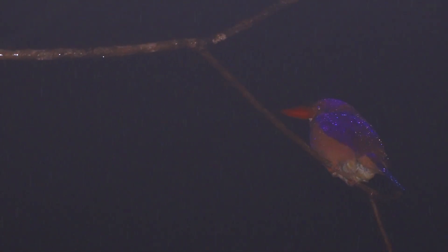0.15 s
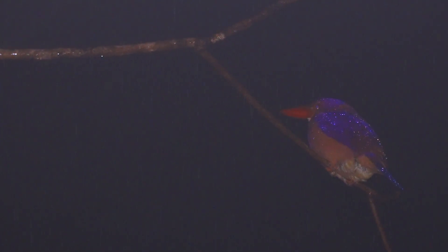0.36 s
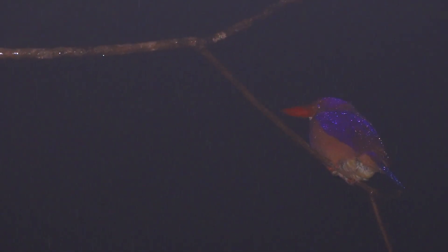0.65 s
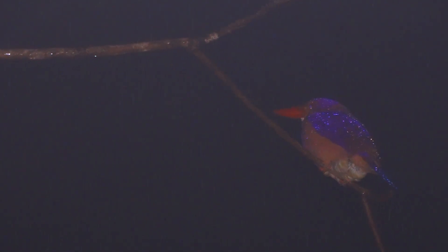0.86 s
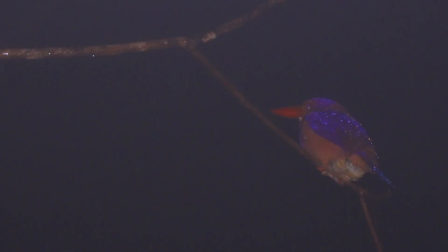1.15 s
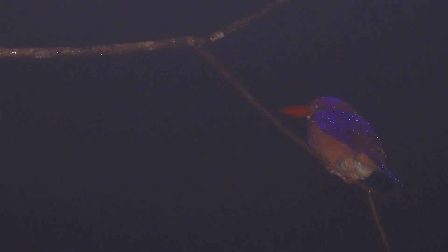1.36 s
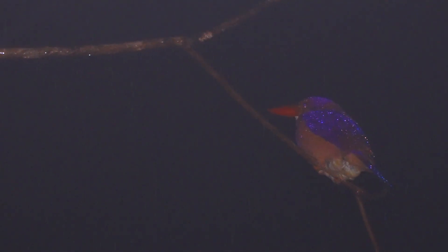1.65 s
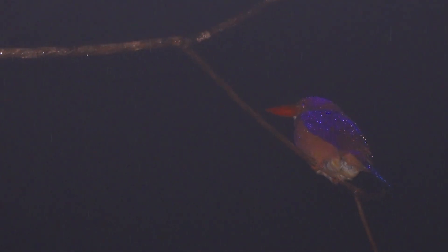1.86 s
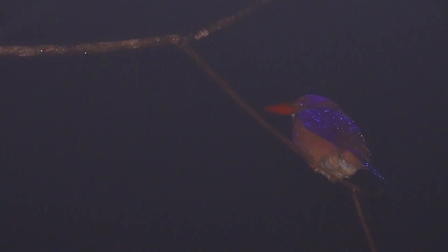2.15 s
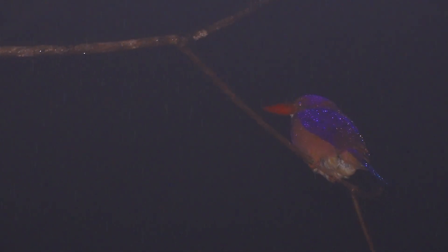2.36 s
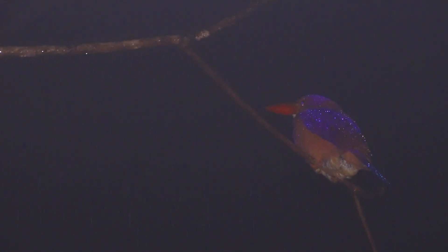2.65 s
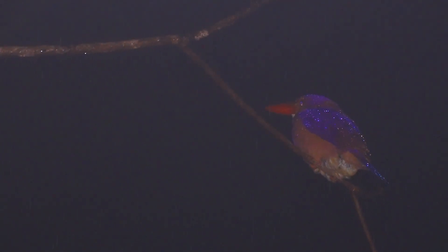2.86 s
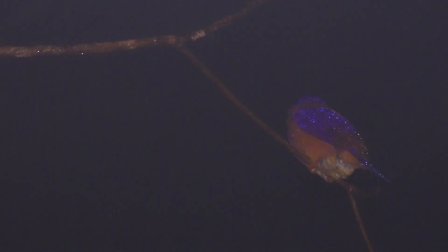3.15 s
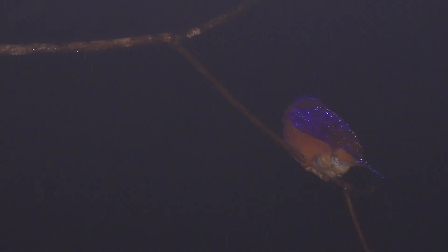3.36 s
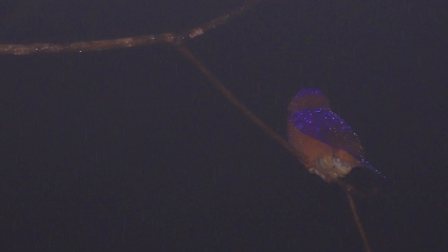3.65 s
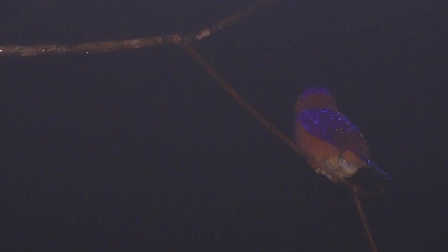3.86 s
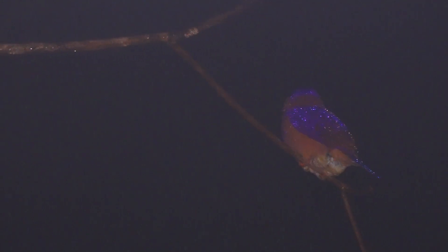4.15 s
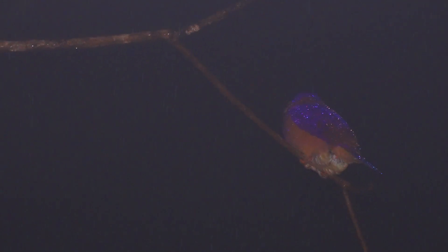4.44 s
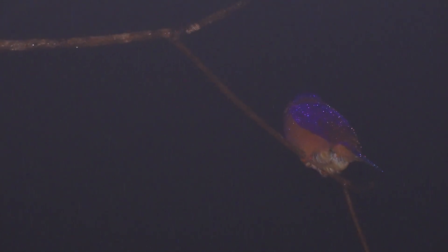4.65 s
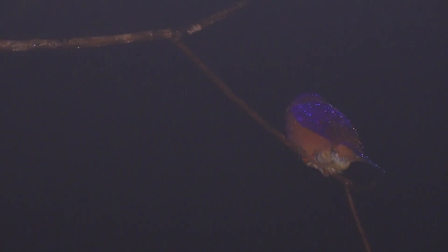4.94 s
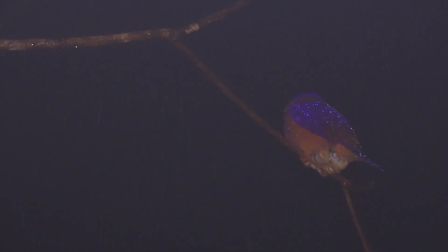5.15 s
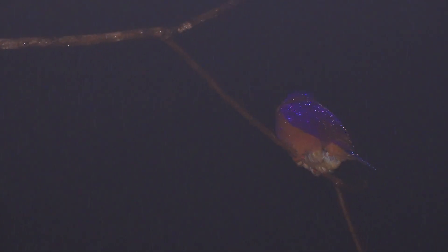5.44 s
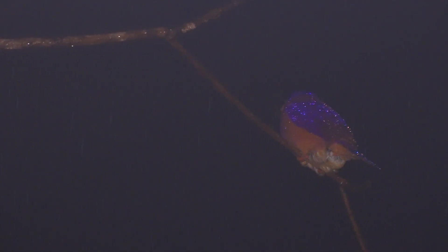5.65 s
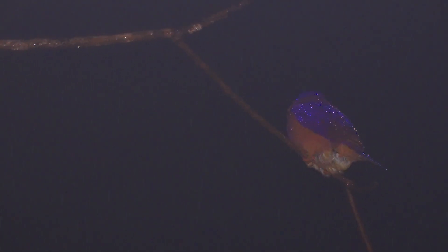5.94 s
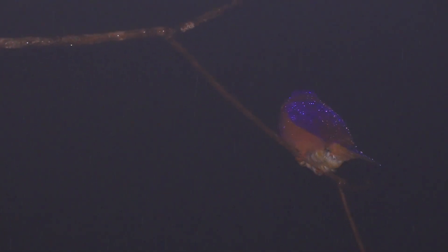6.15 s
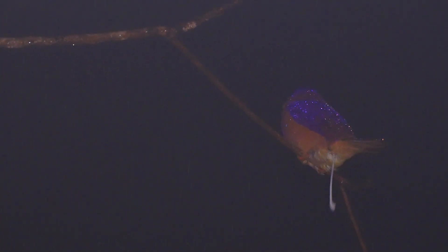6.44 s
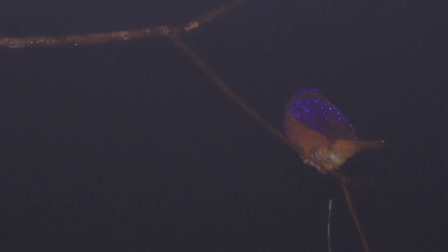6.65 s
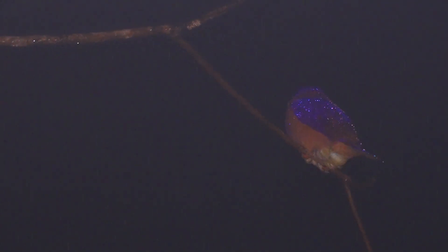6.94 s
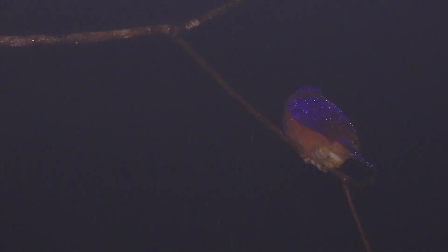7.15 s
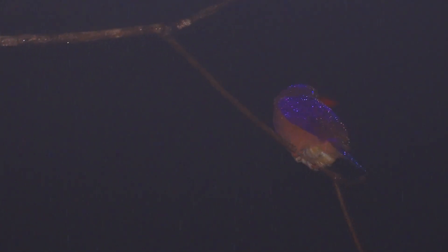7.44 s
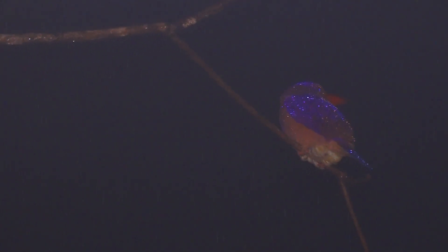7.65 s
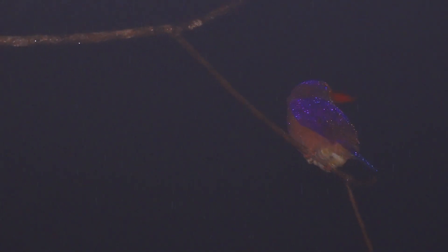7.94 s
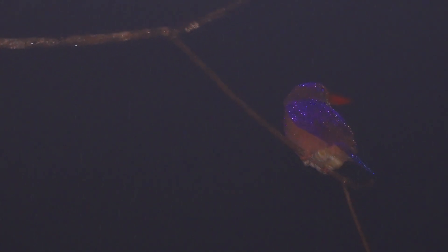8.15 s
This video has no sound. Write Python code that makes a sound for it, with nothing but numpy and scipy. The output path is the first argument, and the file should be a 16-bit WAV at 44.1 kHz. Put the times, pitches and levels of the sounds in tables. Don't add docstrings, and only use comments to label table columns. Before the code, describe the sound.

A near katydid rasps short, high buzzes about every 0.7 seconds over distant rain, cricket trills, faint frog pips and scattered drips.

```python
import sys
import numpy as np
from scipy import signal
from scipy.io import wavfile
from scipy.ndimage import uniform_filter1d

SR = 44100
rng = np.random.default_rng(int(sys.argv[2]) if len(sys.argv) > 2 else 0)


def materialize(psi):
    bounded = np.clip(np.atleast_2d(psi).T, -1, 1)
    quanta = np.round(bounded * 32767).astype(np.int16)
    wavfile.write(sys.argv[1], SR, quanta)


def voltage_ratio(level):
    return 10 ** (np.asarray(level, float) / 20)


N = 366010

# [t/s, peak level/dB, hold/s, hiss level/dB]
NEAR_BUZZES = [
    (0.698, -31.5, 0.0095, -46.5),
    (1.423, -33.5, 0.0358, -45.5),
    (2.198, -32.5, 0.016, -48),
    (3.686, -34, 0.029, -54),
    (4.362, -31.5, 0.01, -46),
    (5.015, -32.5, 0.024, -43),
    (5.804, -32.5, .015, -45),
    (6.538, -32, 0.021, -46),
    (7.27, -31.5, 0.014, -51.5),
    (8.218, -32.5, 0.0205, -52),
]
NEAR_TEETH_HZ = [341.0, 340.8, 342.2, 343.8, 342.0, 341.0, 341.8, 340.8, 340.4, 340.8]
# [f/Hz, width/Hz, level/dB]
WING_MODES = [(9570, 280, 0), (8990, 220, -10), (11950, 500, -17), (14800, 2300, -17)]
# [t/s, level/dB, left-right level/dB]
FAR_BUZZES = [
    [(.01, -40.5, -15), (.33, -45, -7), (.44, -48, -10), (1.08, -48, -11.5), (1.28, -46, -6),
     (1.96, -45, -6.5), (2.62, -48.5, -4), (2.72, -50, -17), (3.48, -43.5, -3), (4.1, -45.5, -11),
     (4.75, -69, 0), (5.51, -48, -7), (6.24, -46.5, -3.5), (6.97, -47, -10), (7.14, -63.5, -3),
     (7.77, -51, -12)],
    [(3.07, -43.5, -10), (3.2, -47, -8), (8.09, -44.5, -13)],
]
FAR_TEETH_HZ = [336.6, 311.6]
LOW_WING, HIGH_WING = (8330, 820), (10170, 640)  # f/Hz, width/Hz
LEAD_S, RISE_S, RISE_DB = .035, 0.03523, -13.5
SLIP_DB, SLIP_S, FADE_DB_PER_S, TAIL_S = -3.5, 0.011, -150, 0.15
TURN_S, TURN_WIDTH_S = .018, .009
LOW_DB, HIGH_DB = (4, -10), (-6, 0)
HISS_DELAY_S, HISS_S, HISS_PAN_DB, HISS_LOW_DB = 0.042, 0.12, -3, 0.5

# [t/s, level/dB, length/s, lower mode
# level/dB]
LEFT_RASPS = [(.022, -51, .043, -7.5), (.195, -51.5, .02, -3), (.243, -45, 0.017, -4),
              (.632, -49.5, 0.047, -8), (0.808, -41.5, 0.15, -12), (1.524, -41, 0.089, 0),
              (3.045, -46, .037, -7), (3.167, -40, 0.047, -16), (3.543, -43, 0.061, -2),
              (4.938, -42.5, 0.0565, -1.5), (5.542, -42.5, 0.056, -15), (5.69, -48, 0.163, -13),
              (7.214, -45, .12, -15)]
# [t/s, level/dB, length/s, lower mode
# level/dB]
RIGHT_RASPS = [(.928, -43, 0.025, -9), (1.172, -49.5, .1, -4), (1.304, -51, .022, -4),
               (2.59, -47.5, .096, -4), (2.72, -46, .015, -4), (3.341, -41.5, 0.085, -5.5),
               (4.008, -44, 0.088, -7), (5.136, -44, 0.042, 0), (6.176, -41.5, .075, -5.5),
               (6.358, -48, 0.056, -6), (7.63, -53, .062, -5), (7.911, -41, 0.074, -10)]
LEFT_PAN_DB, RIGHT_PAN_DB = 13, -13.5

# [t/s, level/dB, left-right level/dB]
PEEPS = [
    (0.7298, -36, -1),
    (1.1717, -37.5, -11),
    (1.6132, -39, -16),
    (2.0552, -38.5, -14),
    (2.5022, -37.5, -14),
    (2.942, -39, -7),
    (6.6493, -58, -2.5),
    (7.5552, -39, -16),
    (8.001, -38.5, -6),
]
# [t/s, level/dB, gap/s]
CHURRS = [
    (.21, -55, 0.263),
    (1.4, -55.5, 0.196),
    (2.45, -57, 0.22),
    (3.46, -57, 0.25),
    (4.58, -55.5, 0.256),
    (5.68, -56.5, 0.25),
    (7.05, -55.5, 0.27),
    (8.18, -54, .3),
]
SWELL_S, CUT_S, SECOND_S, SECOND_DB, MUTTER_DB = 0.14, 0.11, 0.099, -3.5, -70
# [t/s, left return/s, right return/s]
TRILL_BREAKS = [
    (2.4, 1.5, 1),
    (7.26, 1.1, 0.56),
]
TRILL_DB, PAUSE_DB = (-50.5, -51), -19

# [t/s, level/dB, f/Hz, left-right level/dB, t60/s]
LEAF_DROPS = [(.308, -40, 740, 0, 0.035), (0.482, -28, 1690, 8.5, 0.0216), (1.538, -33, 2570, -14, 0.023),
              (1.794, -38.5, 1290, -9, 0.0225), (2.604, -31, 2700, 1, .012), (2.684, -34, 850, .5, .03),
              (2.726, -33.5, 1940, -16, 0.017), (3.44, -27.5, 2940, 0, 0.012), (3.449, -36, 1130, -14, .03),
              (4.878, -31, 3060, 0, 0.0107), (5.077, -32, 2790, 4, 0.015), (5.843, -47.5, 1770, 2.5, .02),
              (6.087, -41, 2490, 1, 0.013), (7.013, -43, 880, 9, .02), (7.272, -26.5, 2020, 1, 0.01)]
# [t/s, level/dB, f/Hz, left-right level/dB, t60/s]
TWIG_TICKS = [(0.2409, -31.5, 9000, 5, 0.008), (0.4794, -39, 9000, 0.5, 0.008),
              (1.0428, -30.5, 9000, -4, 0.008), (1.0591, -27.5, 9100, -5, 0.0064),
              (2.5564, -34.5, 9000, -15, 0.008), (2.7251, -29, 8900, -4.0, 0.008),
              (3.4644, -29.5, 9000, -1.5, 0.008), (3.6603, -25, 9000, -3.5, 0.008),
              (3.9245, -30, 9000, -2.5, 0.008), (4.8794, -44, 9000, -2, 0.008),
              (6.912, -29, 8900, -0.5, 0.0068)]
# [t/s, level/dB, f/Hz, left-right level/dB, t60/s]
THUDS = [
    (2.604, -48, 480, 3, 0.071),
    (5.114, -52.5, 320, -16.5, 0.15),
    (5.348, -58, 264, -20, 0.067),
    (6.159, -59, 333, -19, 0.079),
    (6.82, -53, 298, -4.5, 0.082),
    (7.304, -59, 302, -19.5, 0.076),
]
# [f/Hz, level/dB, t60/s]
LEAF_MODES = [(569, 5, 0.05), (1049, -4.5, 0.068), (1240, 2, 0.07), (1660, -4, .06), (1757, -10, 0.125)]

# [f/Hz, level/dB per Hz]
WASH_SPECTRUM = [(25, -24), (60, -32.5), (130, -15.5), (400, -17), (670, -4.5), (1700, -2), (2900, -5),
                 (3680, -8.5), (4450, -4), (6300, -1.5), (7600, -4.5), (10000, -6.5), (11500, -8),
                 (15800, -10)]
# [f/Hz, correlation]
WASH_LIKENESS = [(60, 0.85), (130, 0.74), (290, 0.266), (640, 0.61), (1410, 0.174), (3100, -0.47),
                 (6820, -0.47), (15000, -0.48)]
# [f/Hz, left-right level/dB]
WASH_LEAN = [(60, 12), (180, -5), (550, 1.5), (1650, 1), (4970, -3), (15000, -1)]
# [f/Hz, level/dB]
HUM = [(48.4, -95), (70.0, -84.5), (118.4, -83)]
WASH_DB = -44.5

EDGE_HZ = 15840
THINNED_HZ, THIN_ABOVE_DB, THIN_SHARE = (2700, 6300), -45, .32


def katydids():
    near, far = np.zeros((2, 2, N))
    for (s, db, hold, _), teeth_hz in zip(NEAR_BUZZES, NEAR_TEETH_HZ):
        add(near, s - LEAD_S, scrape(*stroke(db, hold), teeth_hz), -11, lag=4)
    t = np.arange(-.09, .09, 1 / SR)
    for rows, teeth_hz in zip(FAR_BUZZES, FAR_TEETH_HZ):
        for s, db, pan_db in rows:
            add(far, s - .1, scrape(db - 1500 * t ** 2, -8, -2.5, teeth_hz), pan_db, lag=4)
    direct = (voltage_ratio(-1.0) * near + voltage_ratio(-10.5) * far) * [[-1], [1]]
    return direct + voltage_ratio(-6.5) * forest(near, t60=0.53) + voltage_ratio(-10) * forest(far)


def stroke(peak_db, hold):
    t = np.arange(-LEAD_S, RISE_S + hold + TAIL_S, 1 / SR)
    after = np.maximum(t - RISE_S - hold, 0)
    rise_db = RISE_DB * np.maximum(1 - t / RISE_S, 0) ** 1.7
    slip_db = SLIP_DB * np.minimum(after / SLIP_S, 1)
    effort_db = peak_db + (rise_db + slip_db + FADE_DB_PER_S * after)
    turned = .5 + .5 * np.tanh((t - TURN_S) / TURN_WIDTH_S)
    return [effort_db] + [a + (b - a) * turned for a, b in (LOW_DB, HIGH_DB)]


def scrape(effort_db, low_db, high_db, teeth_hz):
    teeth = strikes(teeth_hz, .0015, size=len(effort_db), spread_db=.7)
    last_gap = np.zeros(rng.integers(30, 90))
    repeats = np.r_[1, np.zeros(36), .25, np.zeros(22), .15, last_gap, .25]
    teeth = evened(signal.lfilter(repeats, 1, teeth))
    teeth = rattle(teeth, rng.integers(40, 56), .6)
    teeth = rattle(teeth, rng.integers(21, 31), -.5)
    teeth = teeth + np.linspace(.12, 1.0, len(teeth)) * rng.standard_normal(len(teeth))
    sound = np.zeros(len(teeth))
    for k, (hz, width, db) in enumerate(WING_MODES):
        sound += (-1) ** k * voltage_ratio(db) * evened(resonate(teeth, hz, width))
    sound = evened(sound)
    sound += voltage_ratio(low_db) * evened(resonate(teeth, *LOW_WING))
    sound -= voltage_ratio(high_db) * evened(resonate(teeth, *HIGH_WING))
    return voltage_ratio(effort_db) * sound * signal.windows.tukey(len(teeth), .15)


def rattle(x, delay, share):
    loop = np.r_[1, np.zeros(delay - 1), share]
    return signal.lfilter(loop[::-1], loop, x)


def rasps():
    out = np.zeros((2, N))
    rows = [(*r, LEFT_PAN_DB) for r in LEFT_RASPS] + [(*r, RIGHT_PAN_DB) for r in RIGHT_RASPS]
    rows += [(s + HISS_DELAY_S, db, HISS_S, HISS_LOW_DB, HISS_PAN_DB) for s, _, _, db in NEAR_BUZZES]
    t = np.arange(-.15, .15, 1 / SR)
    for s, db, length, low_db, pan_db in rows:
        grit = strikes(1300, .3, size=len(t), spread_db=2.5)
        ring = evened(resonate(grit, 14570, 2560)) + voltage_ratio(low_db) * evened(resonate(grit, 13080, 2100))
        swell = np.exp(-(t / (0.46 * length)) ** 2) + 0.186 * np.exp(-abs(t) / 0.061)
        add(out, s - .15, voltage_ratio(db) * ring * swell, pan_db, lag=3)
    return voltage_ratio(-5) * out * [[1], [-1]] + voltage_ratio(-3.0) * forest(out, t60=0.377)


def crickets():
    t = np.arange(N) / SR
    churr, peeps = np.zeros((2, 2, N))
    beat = strikes(45.17, .006, size=N, spread_db=2.5)
    beat = beat + 0.4 * np.roll(beat, 325) + 0.123 * np.roll(beat, 651)
    trill = evened(forest(resonate(beat, 7190, 330)[None], t60=0.36)) * trill_level(t)
    grit = strikes(120, .4, size=N, spread_db=3.5)
    add(churr, 0, churr_level(t) * evened(resonate(grit, 4500, 520)), -2.5)
    u = np.arange(0, .04, 1 / SR)
    peep = np.sin(2 * np.pi * np.cumsum(6120 - 14000 * u) / SR) * np.sin(np.pi * u / .04) ** 2
    for s, db, pan_db in PEEPS:
        add(peeps, s - .01, voltage_ratio(db - 1.5) * peep, pan_db / 4, lag=2)
    echoes = forest(voltage_ratio(2.5) * churr + voltage_ratio(1) * peeps, t60=.2)
    return trill + voltage_ratio(4) * churr * [[1], [-.35]] + voltage_ratio(-0.5) * peeps + echoes


def trill_level(t):
    gone = sum((t > s) * np.clip(1 - (t - s) / np.c_[back], 0, 1) for s, *back in TRILL_BREAKS)
    return voltage_ratio(np.c_[list(TRILL_DB)] + PAUSE_DB * uniform_filter1d(gone, 3000))


def churr_level(t):
    level = voltage_ratio(MUTTER_DB) * np.ones(len(t))
    for s, db, gap in CHURRS:
        level += voltage_ratio(db) * np.exp(-((t - s) / np.where(t < s, SWELL_S, CUT_S)) ** 2)
        level += voltage_ratio(db + SECOND_DB) * np.exp(-((t - s - gap) / SECOND_S) ** 2)
    return level


def frog():
    cycle = np.roll(strikes(5.98, .002, size=N, spread_db=3.5), 300)
    low = resonate(cycle + 0.33 * np.roll(cycle, 3600), 1722, 71.5)
    pips = voltage_ratio(-69) * evened(low) + voltage_ratio(-74.5) * evened(resonate(cycle, 1962, 65))
    pips = pips * voltage_ratio([[3], [-3]])
    return pips + voltage_ratio(2.5) * forest(pips, t60=0.38, likeness=0.29)


def drops():
    out, t = landed(LEAF_DROPS + TWIG_TICKS), np.arange(3000) / SR
    leaf = sum(voltage_ratio(db - 60 * t / t60) * np.sin(2 * np.pi * hz * t) for hz, db, t60 in LEAF_MODES)
    add(out, LEAF_DROPS[1][0], voltage_ratio(-40.5) * leaf, 5)
    u = t[:600]
    for hz in np.geomspace(700, 9000, 10):
        size = voltage_ratio(4.55 * np.minimum(rng.exponential(1, (2, N)), 5)) * (rng.random((2, N)) < 14 / SR)
        tap = np.sin(2 * np.pi * hz * u) * np.exp(-u * hz / 4.8)
        out += voltage_ratio(-64.5) * signal.oaconvolve(size, tap[None], axes=1)[:, :N]
    out = signal.sosfilt(signal.butter(3, 480, "highpass", fs=SR, output="sos"), out)
    out += signal.sosfilt(signal.butter(2, 100, "highpass", fs=SR, output="sos"), landed(THUDS))
    return out + voltage_ratio(-7) * forest(out, t60=.12, likeness=.3)


def landed(rows):
    out, t = np.zeros((2, N)), np.arange(3000) / SR
    for s, db, hz, pan_db, t60 in rows:
        spray = 0.125 * rng.standard_normal(3000) * voltage_ratio(-60 * t / t60)
        splash = resonate((t == 0) + spray, hz, 0.515 * hz)
        add(out, s, voltage_ratio(db - 4.5) * splash / abs(splash).max(), pan_db)
    return out


def wash():
    frames, hz = N // 256 + 5, np.fft.rfftfreq(1024, 1 / SR)
    a, b, c, d, patches = rng.standard_normal((frames, 513, 5)).T
    patches = evened(uniform_filter1d(uniform_filter1d(patches, 14, 0), 12, 1))
    flicker = evened(uniform_filter1d(rng.standard_normal(frames), 6))
    same = np.clip(read(WASH_LIKENESS, hz), -1, 1)[:, None]
    left = a + 1j * b
    right = same * left + np.sqrt(1 - same ** 2) * (c + 1j * d)
    level_db = read(WASH_SPECTRUM, hz)[:, None] + 1.54 * patches + 0.42 * flicker
    lean_db = read(WASH_LEAN, hz)[:, None] * [[[.5]], [[-.5]]]
    spectra = np.array([left, right]) * voltage_ratio(level_db + lean_db)
    rain = signal.istft(spectra, nperseg=1024, noverlap=768)[1][:, :N]
    t = np.arange(N) / SR
    hum = sum(voltage_ratio(db + 4.5) * np.sin(2 * np.pi * f * t + [[0], [.6]]) for f, db in HUM)
    return voltage_ratio(WASH_DB) * evened(rain) + hum


def forest(x, t60=.5, likeness=-.3):
    grid = np.arange(100, SR // 3, 20)
    at = grid + rng.integers(0, 20, (2, len(grid)))
    taps = np.zeros((2, SR // 3 + 20))
    np.put_along_axis(taps, at, rng.choice([-1., 1.], at.shape) * voltage_ratio(-60 * at / SR / t60), 1)
    taps[1] = likeness * taps[0] + np.sqrt(1 - min(likeness ** 2, 1)) * taps[1]
    return signal.oaconvolve(x.mean(0)[None], taps / np.linalg.norm(taps[0]), axes=1)[:, :N]


def strikes(per_s, jitter, size, spread_db):
    wander = evened(uniform_filter1d(rng.standard_normal(size), 400))
    turns = np.cumsum(per_s * (1 + jitter * wander)) / SR
    at = np.flatnonzero(np.diff(np.floor(turns), prepend=0))
    late = (turns[at] % 1) * SR / per_s
    out, near = np.zeros(size + 16), np.arange(16)
    strength = voltage_ratio(spread_db * rng.standard_normal(size)[at, None])
    clicks = np.sinc(near - 8 + late[:, None]) * np.hanning(16) * strength
    np.add.at(out, at[:, None] + near, clicks)
    return out[:size]


def resonate(x, hz, width):
    turn = np.exp(2j * np.pi * np.cumsum(hz * np.ones(len(x))) / SR)
    r = np.exp(-np.pi * width / SR)
    return 2 * (turn * signal.lfilter([(1 - r) ** 2], [1, -2 * r, r * r], x / turn)).real


def add(mix, s, sound, pan_db, lag=0):
    start = round(s * SR)
    sound, start = sound[max(-start, 0):], max(start, 0)
    for part, db in ((mix[0, start:], pan_db / 2), (mix[1, start + lag:], -pan_db / 2)):
        part[:len(sound)] += voltage_ratio(db) * sound[:len(part)]


def evened(x):
    return x / np.sqrt(np.mean(x ** 2) + 1e-20)


def read(points, hz):
    f, value = np.transpose(points)
    return np.interp(np.log(hz + 1), np.log(f + 1), value)


def scene():
    return katydids() + rasps() + crickets() + frog() + drops() + wash()


def thin_middle(x):
    loud_db = 10 * np.log10(abs(uniform_filter1d((x ** 2).mean(0), 4000)) + 1e-12)
    band_pass = signal.butter(2, THINNED_HZ, "bandpass", fs=SR, output="sos")
    band = signal.sosfiltfilt(band_pass, x.mean(0))
    return x - band * (1 - voltage_ratio(-THIN_SHARE * np.maximum(loud_db - THIN_ABOVE_DB, 0)))


def top_cut(x):
    return signal.sosfilt(signal.butter(12, 15830, fs=SR, output="sos"), x)


def record(dry):
    low_pass = signal.firwin(1023, EDGE_HZ, window=("kaiser", 9), fs=SR)
    limited = signal.oaconvolve(thin_middle(dry), low_pass[None], "same")
    return top_cut(limited)


dry = scene()
out = record(dry)
materialize(out)
```